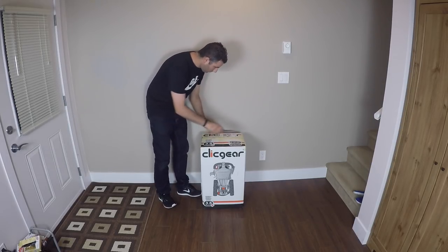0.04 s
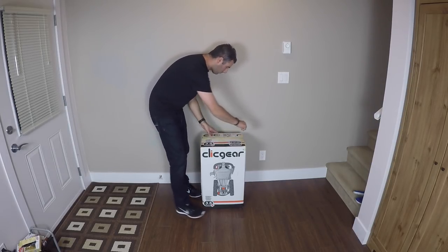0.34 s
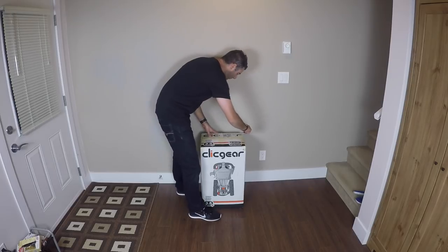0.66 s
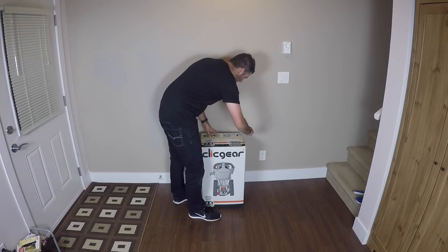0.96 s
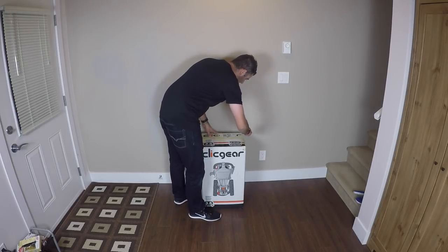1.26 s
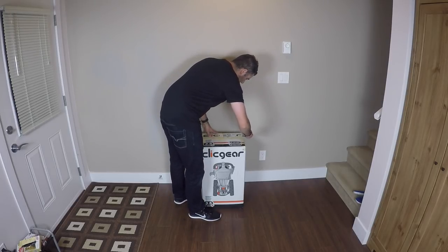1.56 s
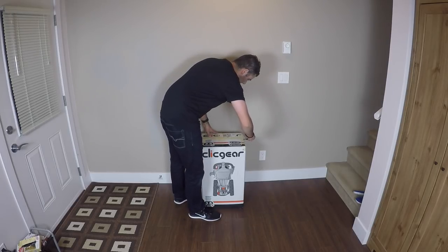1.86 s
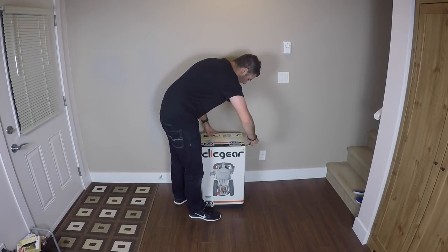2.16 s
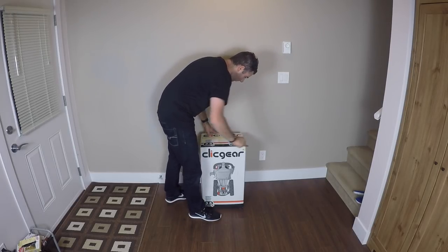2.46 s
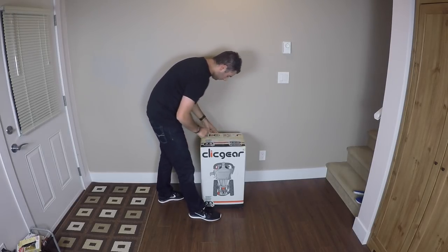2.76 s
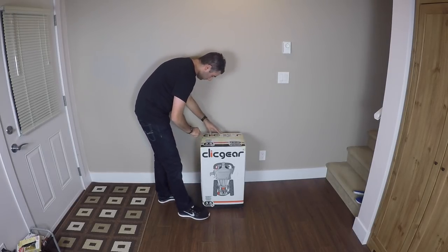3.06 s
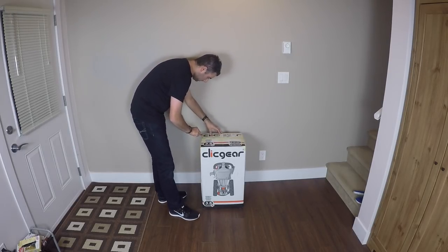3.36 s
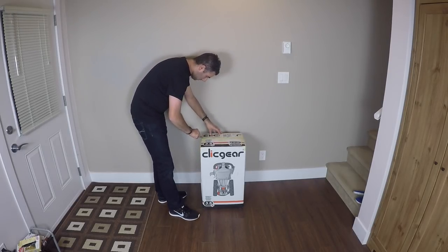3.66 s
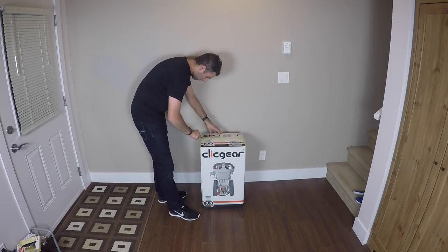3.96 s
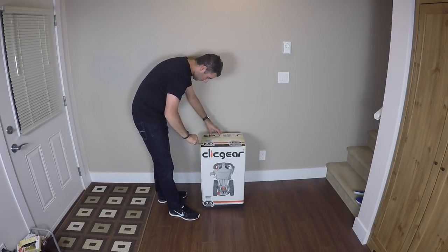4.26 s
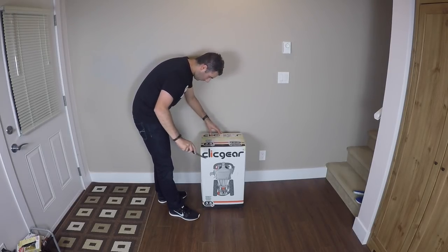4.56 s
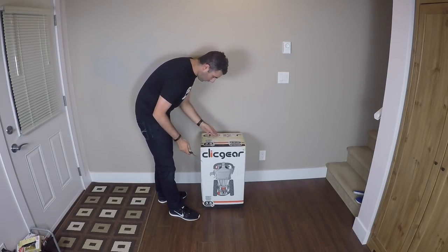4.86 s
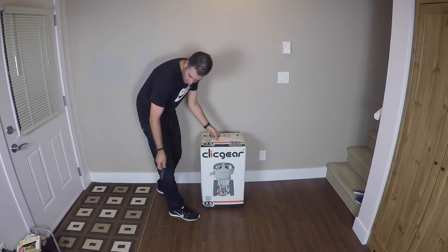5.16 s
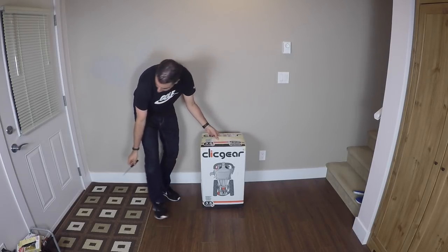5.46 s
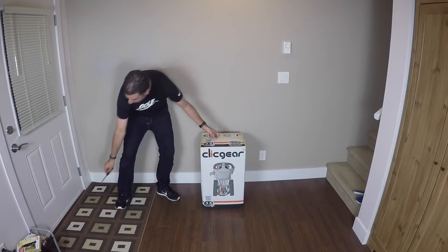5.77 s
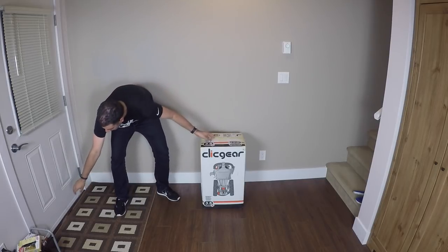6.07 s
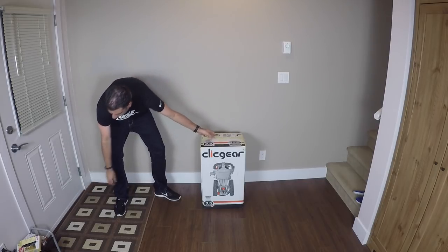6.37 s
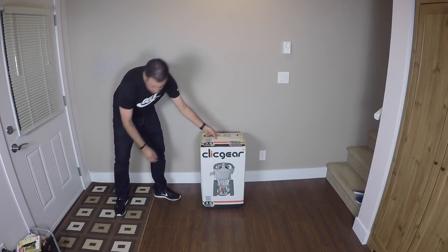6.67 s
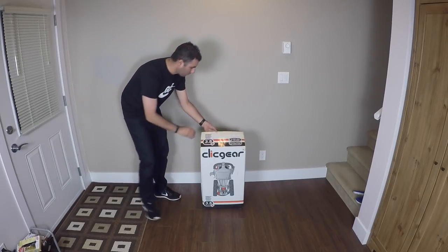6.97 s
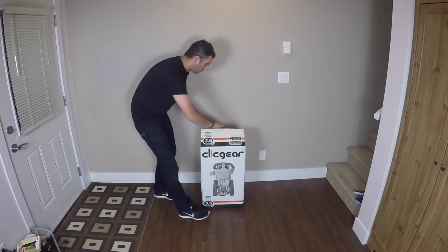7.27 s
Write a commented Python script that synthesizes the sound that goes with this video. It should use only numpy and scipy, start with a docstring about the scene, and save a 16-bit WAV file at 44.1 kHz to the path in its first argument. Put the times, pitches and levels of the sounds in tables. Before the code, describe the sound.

In a small, bare hallway, hands brush a cardboard box and a knife rasps through its packing tape, making the hollow panels drone. More short cuts follow, with crackling tape, knocks and soft shuffling steps. The knife is put down on the wooden floor with a sharp clack, then the flaps are pulled and the last tape pops. One fairly near microphone picks up a short room echo.

```python
"""Opening a taped box in a hallway

One microphone in a small, bare hallway with a wooden floor, just near enough for the direct sound
to outweigh the walls. A knife sticks and slips through the packing tape of a tall cardboard box,
tearing fibres while the panels drum. Hands brush the board and shoes shuffle; the knife is put
down with a clack, and the flaps are pulled until the last tape pops."""
import sys
import numpy as np
from scipy import signal
from scipy.fft import rfft, irfft, next_fast_len
from scipy.io import wavfile
from scipy.ndimage import uniform_filter1d, minimum_filter1d, map_coordinates

SR = 44100
rng = np.random.default_rng(int(sys.argv[2]) if len(sys.argv) > 2 else 0)


def to_wav(sig):
    """Store sig (one row per channel, or 1-D mono) as 16-bit WAV at the path in sys.argv[1].

    Samples outside -1..1 are clipped; the rate is SR.
    """
    pcm = np.clip(np.atleast_2d(sig), -1, 1) * 32767
    pcm = np.round(pcm).astype(np.int16)
    wavfile.write(sys.argv[1], SR, pcm.T)  # frames by channels


N = 331632
TIME = np.arange(N) / SR
AGE = np.arange(SR // 3) / SR  # seconds since a blow

# Spectra of the box and its tape. Each row: frequency in Hz, level in dB.
BOX_COLOUR = [(29, -36), (50, -13), (76, -5.5), (114, -3.5), (182, 3.5), (219, -8.5), (286, -4), (340, -3),
              (391, -13), (432, -8), (591, -9), (850, -15), (1000, -19), (1300, -40), (2200, -120)]  # the hollow body, rubbed or cut
DRUM_COLOUR = [(30, -34), (70, -10), (120, -2.5), (170, 2.5), (240, -3), (330, -7.5), (450, -31.5),
               (900, -73.5)]  # the panels, struck
BOARD_COLOUR = [(150, -27.5), (330, -1.5), (550, 0), (750, -6), (1000, -9), (1500, -19), (3000, -78)]  # the midrange knock of cardboard
TAPE_COLOUR = [(2940, -20), (5000, -3), (9880, -9.5), (10700, -11.5), (13400, -13), (15200, -19),
               (16000, -26)]  # tape splitting


def amp(db):
    """Decibels to gain."""
    return 10 ** (np.asarray(db) / 20)


def unit(x):
    """Scale to rms 1."""
    return x / np.sqrt(np.mean(x ** 2) + 1e-20)


def burst(x):
    """Scale a blow to the energy of 20 ms at rms 1."""
    return x / np.sqrt(np.sum(x ** 2) / (SR * .02) + 1e-20)


def along(points, hz):
    """Read (Hz, value) points on a log frequency axis."""
    freqs, values = np.transpose(points)
    return np.interp(np.log(hz + 1), np.log(freqs + 1), values)


def add(track, start_s, x):
    """Mix x into track from start_s on."""
    start = max(round(start_s * SR), 0)
    track[start:start + len(x)] += x[:max(N - start, 0)]


def coloured(x, colour):
    """Pass x through a minimum-phase filter with the given (Hz, dB) spectrum."""
    size = 4096
    cepstrum = irfft(np.log(amp(along(colour, np.fft.rfftfreq(size, 1 / SR))) + 1e-6))
    cepstrum[1:size // 2] *= 2
    cepstrum[size // 2 + 1:] = 0
    impulse_response = irfft(np.exp(rfft(cepstrum)))
    return signal.fftconvolve(x, impulse_response)[:len(x)]


def resonate(x, modes):
    """Pass x through parallel (Hz, width in Hz, dB) resonances."""
    size = next_fast_len(len(x) + SR // 4)
    f = np.fft.rfftfreq(size, 1 / SR)
    response = sum(amp(db) * 1j * f * width / (hz * hz - f * f + 1j * f * width)
                   for hz, width, db in modes)
    return irfft(rfft(x, size) * response, size)[:len(x)]


def wobble(rate):
    """A smooth random curve, rate knots a second."""
    return map_coordinates(rng.standard_normal(int(N * rate / SR) + 4), [TIME * rate])


def stroke(start, length, attack, release=0.026):
    """A gain that rises, holds for the length of the stroke and lets go; times in seconds."""
    rising = (TIME - start) / attack + .5
    falling = (start + length - TIME) / release + 1
    return np.clip(np.minimum(rising, falling), 0, 1)


def swell(middle, length):
    """A gain that swells and fades like the speed of a sweeping hand."""
    return np.cos(np.pi * np.clip((TIME - middle) / length, -.5, .5))


def fibres(rate, spread_db, size=N):
    """Breaking fibres: random impulses of uneven strength, rate a second."""
    strength = rng.choice([-1, 1], size) * amp(spread_db * np.clip(rng.standard_normal(size), -2, 2))
    return unit(strength * (rng.random(size) < rate / SR))


def crunch(length, colour, rate=9000, spread_db=4, rise=0.00078):
    """A clump of fibre breaks that builds quickly and dies away within length seconds."""
    shape = amp(-60 * AGE / length) * (1 - np.exp(-AGE / rise))
    return burst(coloured(fibres(rate, spread_db, size=len(AGE)) * shape, colour))


def room_tone():
    """Still air and the faint, wavering hum of an appliance."""
    # The air's spectrum and the hum's partials. Each row: frequency in Hz, level in dB.
    air_colour = [(20, -22), (45, 1), (70, 0.5), (100, -15), (175, -9.5), (260, -10.5), (600, -21.5),
                  (1400, -20.5), (3200, -27.5), (8000, -41.5), (16000, -50)]
    partials = [(59.2, -58), (177.6, -53)]
    hum = 0
    for hz, db in partials:
        peak = amp(db + 2.7 * wobble(1.78)) * np.sqrt(2)
        hum += peak * np.sin(2 * np.pi * hz * TIME + .5 * wobble(3.4))
    return hum + amp(-45) * unit(coloured(rng.standard_normal(N), air_colour))


def hallway(x, paths=16, turns_per_s=90):
    """Diffuse echo of the walls; each moment takes another path to the microphone as the hands move."""
    # How long the hallway rings. Each row: frequency in Hz, seconds to fall 60 dB.
    decay_times = [(100, 0.31), (260, 0.39), (700, 0.39), (1800, 0.56), (4800, 0.48), (12800, 0.38)]
    # Strength of the echo. Each row: frequency in Hz, level in dB.
    wall_colour = [(100, 0.5), (300, -3), (700, 0), (1400, -2), (3300, -1), (7000, -3.5), (14000, -6)]
    hz, t, noise = signal.stft(rng.standard_normal((paths, SR * 2 // 3)), SR, nperseg=256)
    decay = amp(-60 * t / along(decay_times, hz)[:, None])
    energy = np.sum(decay ** 2, 1, keepdims=True) * t[1] * SR
    decay *= amp(along(wall_colour, hz))[:, None] / np.sqrt(energy)
    _, tails = signal.istft(noise * decay, SR)
    out = np.zeros(N)
    for k, tail in enumerate(tails):
        crossfade = np.sin(np.pi / 2 * np.minimum((TIME * turns_per_s - k) % paths, 2))
        add(out, .005, signal.oaconvolve(x * crossfade, tail))
    return out


def brushing():
    """Palms and sleeves rub the box, which murmurs under them."""
    # Hand movements. Each row: middle and length in seconds, rustle and murmur in dB.
    sweeps = [(0.106, 0.73, -51.5, -56.5), (0.517, 0.39, -44, -45), (0.854, 0.51, -42, -46),
              (1.154, 0.2, -41.5, -40.5), (1.368, 0.28, -35, -35), (2.496, .3, -56, -48),
              (2.785, 0.4, -36.5, -34.5), (3.377, 0.27, -32.5, -33), (3.004, 0.22, -47, -40.5),
              (3.886, 0.86, -36, -33), (4.912, 0.28, -44.5, -33), (5.226, 0.62, -34, -50),
              (5.74, 0.57, -46.5, -41.5), (6.028, 0.29, -40.5, -44), (6.76, 0.78, -40.5, -43)]
    # The rubbed surface. Each row: frequency in Hz, level in dB.
    rustle_colour = [(150, 7), (350, -24.5), (700, -4.5), (1400, 3.5), (2400, -1), (3100, 4), (5000, -6.5),
                     (8000, -13), (13000, -20), (16000, -26)]
    rustle = unit(coloured(fibres(5000, spread_db=7), rustle_colour)) * amp(2.7 * wobble(30))
    murmur = unit(coloured(fibres(900, spread_db=1.5), BOX_COLOUR))
    return sum(swell(middle, length) * (amp(rustle_db) * rustle + amp(murmur_db) * murmur)
               for middle, length, rustle_db, murmur_db in sweeps)


def thuds():
    """A soft push swings one low mode of the box or floor, with a dull scuff on top."""
    # Bumps on the box and footfalls. Each row: start in seconds, level in dB, pitch in Hz.
    bumps = [(3.115, -28, 200), (3.49, -38, 189), (3.588, -10.5, 175), (3.792, -16.5, 216),
             (4.053, -13, 180), (4.079, -8, 167), (4.459, -16.5, 177), (4.651, -23.5, 185),
             (4.797, -24, 145), (4.831, -29, 71), (4.87, -25.5, 219), (4.935, -17, 130),
             (4.984, -25.5, 233), (5.078, -16, 147), (5.395, -14.5, 140), (6.468, -28.5, 316),
             (6.713, -27.5, 157), (6.778, -27.5, 164), (6.876, -16, 153), (6.936, -16.5, 158),
             (7.238, -36, 144), (7.325, -30, 119), (7.502, -15, 129)]
    sag = 1 + 0.1 * np.exp(-AGE / 0.0049)  # a panel is stiffer while it is pushed in
    shape = amp(-60 * AGE / 0.0732) * (1 - np.exp(-AGE / 0.0029))
    out = np.zeros(N)
    for start, db, hz in bumps:
        swing = shape * np.sin(2 * np.pi * hz * np.cumsum(sag) / SR)
        scuff = 0.6 * crunch(0.0432, DRUM_COLOUR, rise=0.0059)
        scuff += 0.23 * crunch(0.06, BOARD_COLOUR, rise=0.0033)
        add(out, start, amp(db) * (burst(swing) + scuff))
    return out


def scratch(middle=.7, length=.07, middle_hz=2760, octaves_per_s=18):
    """An accelerating scratch over the ridges of taut tape rises to a rough, hissing whistle."""
    ridge_hz = middle_hz * 2 ** (octaves_per_s * np.clip(TIME - middle, -length, length))
    phase = 2 * np.pi * np.cumsum(ridge_hz * (1 + .085 * wobble(1200))) / SR
    whistle = np.sin(phase) + 0.22 * np.sin(2 * phase) + 0.14 * np.sin(3 * phase)
    hiss = unit(coloured(fibres(7000, spread_db=5), TAPE_COLOUR))
    hiss *= amp(-9.5) * (ridge_hz / middle_hz) ** 2  # grows with speed
    rough_whistle = unit(whistle * amp(4.3 * wobble(700)))
    return amp(-28) * swell(middle, length) * (rough_whistle + hiss)


def stray_snaps(per_s=3.5, until_s=6.2, spread_db=9):
    """Rows (seconds, paper dB, tape dB) of faint chance snaps while the hands work the box."""
    when, strength = rng.random((int(per_s * until_s), 2)).T
    offset_db = spread_db * (2 * strength - 1)
    return list(zip(when * until_s, offset_db - 52.5, offset_db - 52))


def snaps():
    """Strands of tape and paper part with a short crackle."""
    # The main snaps. Each row: start in seconds, paper and tape in dB.
    main_snaps = [(.063, -43.5, -52.5), (0.284, -45, -69), (0.458, -43, -46), (.716, -31, -32),
                  (1.111, -35, -42), (1.275, -32.5, -34), (1.348, -34, -36.5), (1.427, -28, -44),
                  (1.803, -46, -37), (1.975, -28, -29), (2.181, -33, -24), (2.745, -43, -30),
                  (2.763, -30.5, -34.5), (3.299, -21, -37), (3.391, -20.5, -32), (3.485, -21.5, -25.5),
                  (3.527, -16, -19.5), (3.554, -17.5, -21), (4.007, -36, -42), (4.099, -18.5, -23.5),
                  (4.433, -31, -33), (4.584, -38.5, -42.5), (4.929, -37, -65), (5.196, -27.5, -33),
                  (5.365, -32, -25.5), (5.672, -45, -43), (6.4, -43, -52), (6.636, -28.5, -26.5),
                  (6.913, -26.5, -29), (6.928, -23, -23)]
    # Paper fibre breaking. Each row: frequency in Hz, level in dB.
    paper_colour = [(500, -24.5), (1500, -14), (2400, -4.5), (3300, 1.5), (4500, -6), (6000, -17.5),
                    (10000, -29)]
    out = np.zeros(N)
    for start, paper_db, tape_db in main_snaps + stray_snaps():
        paper = crunch(0.043, paper_colour, rise=0.0035)
        tape = crunch(0.06, TAPE_COLOUR, rate=2200, spread_db=5, rise=0.0012)
        add(out, start, amp(paper_db) * paper + amp(tape_db) * tape)
    return out


def pops():
    """Board gives way at once: the tape cracks, the edge clacks, the panels drum a little longer."""
    # Knocks and pops around the box. Each row: start in seconds, clack and drum in dB, clack in Hz.
    knocks = [(.561, -34.5, -33, 1640), (.609, -34.5, -30, 1740), (0.775, -31, -31.5, 2920),
              (1.347, -32, -31.5, 1430), (1.453, -33, -24, 1280), (2.268, -13, -25.5, 1410),
              (2.7, -32, -22, 620), (2.763, -28, -28.5, 1740), (4.098, -14, -21, 1400),
              (4.129, -16, -17, 2980), (4.146, -19.5, -11, 1620), (4.433, -21.5, -15.5, 1500),
              (5.073, -14, -22, 1310), (5.363, -20, -23, 4160), (6.481, -24.5, -39, 2070),
              (6.572, -20, -27, 1180), (6.586, -17.5, -23, 1910), (6.929, -19.5, -20.5, 1490),
              (7.499, -40, -22, 704)]
    # A cardboard edge. Each row: frequency in Hz, level in dB.
    edge_colour = [(400, -37), (900, -4), (1400, 5), (2300, -3), (3200, 1), (4500, -7), (6500, -16),
                   (12000, -36)]
    out = np.zeros(N)
    for start, clack_db, drum_db, clack_hz in knocks:
        edge = crunch(0.048, edge_colour)
        clack = amp(clack_db) * burst(edge + 2.3 * resonate(edge, [(clack_hz, 0.31 * clack_hz, 0)]))
        tape = amp(clack_db - 28.5) * crunch(0.055, TAPE_COLOUR, rate=4200, spread_db=5)
        board = amp((clack_db + drum_db) / 2 - 1) * crunch(0.056, BOARD_COLOUR)
        drum = amp(drum_db) * crunch(0.066, DRUM_COLOUR)
        add(out, start, clack + tape + board + drum)
    return out


def knife_down():
    """The knife strikes the floor twice in quick succession and the boards knock back."""
    # Tip, then handle. Each row: time in seconds, then clack, click and floor thump in dB.
    strikes = [(6.2112, -13.5, -26, -18), (6.2192, -11, -22.5, -26)]
    # Floorboard resonances. Each row: frequency and width in Hz, level in dB.
    floor_modes = [(199, 32, 13), (129, 87, -18)]
    # The strike's body and its bright onset. Each row: frequency in Hz, level in dB.
    clack_colour = [(60, -10), (200, -3), (450, -7), (600, 3), (950, -1), (1250, -4.5), (1550, -5),
                    (2400, -16), (3200, -18), (5000, -41), (9000, -41), (16000, -61)]
    click_colour = [(900, -21), (3200, 6.5), (5300, -3), (8000, -14.5), (16000, -37)]
    ring = resonate(signal.unit_impulse(len(AGE)), floor_modes)
    thump = burst(ring * (1 - np.exp(-AGE / 0.00062)))
    out = np.zeros(N)
    for time, clack_db, click_db, thump_db in strikes:
        add(out, time, amp(clack_db) * crunch(0.054, clack_colour) + amp(thump_db) * thump)
        # treble travels fastest through a board, so the click arrives first
        add(out, time - .0012, amp(click_db) * crunch(0.017, click_colour))
    return out


def gliding(start=2.975, ease_db_per_s=30):
    """Drawn lightly along the seam, the blade only scuffs the surface: a fine grain."""
    # The scuffed seam. Each row: frequency in Hz, level in dB.
    seam_colour = [(240, -5), (400, -12), (489, -12), (753, -12.5), (826, -9), (893, -8), (1070, -9),
                   (1420, 0), (2120, -3), (2290, -7), (3120, -2.5), (5520, -14.5), (12900, -27),
                   (16000, -36)]
    contact = stroke(start, length=.495, attack=.17)
    push = contact * amp(-20.5 - ease_db_per_s * np.maximum(TIME - start, 0))
    grain = unit(coloured(fibres(9000, spread_db=2), seam_colour))
    return push * grain * amp(1.14 * wobble(35))


def cut_gains(ease_db_per_s=12):
    """Gains of board, box and tape: the push eases along each stroke while the tape hisses evenly."""
    # Cuts and tears. Each row: start, length and attack in seconds, then rasp, drone and hiss in dB.
    cuts = [(1.452, 0.6, 0.02, -22, -16, -36.5), (2.029, 0.12, 0.02, -21, -19.5, -32.5),
            (2.184, 0.064, 0.056, -19.5, -20, -26), (3.481, .13, 0.025, -20.5, -16, -26.5),
            (3.771, 0.098, 0.022, -23, -22, -31), (4.053, 0.109, 0.048, -20.5, -13, -29),
            (4.204, 0.097, 0.027, -29, -28, -35), (4.333, 0.13, .02, -24.5, -23.5, -34.5),
            (5.03, 0.024, 0.0067, -22.5, -22.5, -24.5), (5.181, 0.02, 0.011, -26.5, -22.5, -32.5),
            (5.317, 0.098, 0.021, -29.5, -30.5, -33.5), (6.832, 0.031, 0.014, -28, -27.5, -38),
            (6.925, 0.044, .006, -27.5, -19, -53)]
    rasp = drone = hiss = 0
    for start, length, attack, rasp_db, drone_db, hiss_db in cuts:
        contact = stroke(start, length, attack)
        push = contact * amp(-ease_db_per_s * np.maximum(TIME - start, 0))
        rasp += amp(rasp_db) * push
        drone += amp(drone_db) * push
        hiss += amp(hiss_db) * contact
    return rasp, drone, hiss


def flap_squawks(torn, width_hz=140):
    """Tearing fibres ring the flap, which squawks as the blade nears the end of the seam."""
    # Each row: middle and length in seconds, level in dB, pitch in Hz.
    squawks = [(2.086, 0.038, -21, 1120), (2.228, 0.033, -21, 1570)]
    return sum(amp(db) * swell(middle, length) * unit(resonate(torn, [(hz, width_hz, 0)]))
               for middle, length, db, hz in squawks)


def cutting():
    """The blade sticks and slips through the flutes: each slip shakes the box and tears some fibres."""
    # Resonances of the box and of the flap being cut. Each row: frequency and width in Hz, level in dB.
    panel_modes = [(189, 32, -1), (319, 77, -0.5), (512, 82, 3.5)]
    flap_modes = [(1330, 680, -13.5), (1430, 590, 6.5), (3030, 150, 3), (4380, 113, -6)]
    # Cardboard tearing. Each row: frequency in Hz, level in dB.
    rasp_colour = [(500, -13.5), (850, -5.5), (921, 0.5), (998, -4.5), (1120, 0.5), (1220, -2), (1540, -2),
                   (2250, -2), (3100, -2.5), (3760, -0.5), (4070, -2), (4520, -5.5), (5800, -13.5),
                   (7540, -35), (12800, -120)]
    slip_hz = 172 * np.exp(.2 * wobble(25) + .28 * wobble(210))
    slip_count = np.floor(np.cumsum(slip_hz) / SR)
    slips = np.diff(slip_count, prepend=0) * amp(4.4 * wobble(130))
    puffs = np.abs(signal.fftconvolve(slips, amp(-60 * AGE / 0.026))[:N])
    tearing = unit(.5 + unit(puffs))
    push = 0.37 * unit(slips) + fibres(2500, spread_db=3.5)
    box = coloured(push + 0.43 * resonate(push, panel_modes), BOX_COLOUR)
    # fine fibres pulse with the slips; coarse strands break at random
    torn = tearing * fibres(4500, spread_db=4.5) + 0.33 * fibres(130, spread_db=4)
    # as the blade travels it drives each resonance of the flap more or less strongly
    flap = sum(resonate(torn * amp(4.2 * wobble(22)), [mode]) for mode in flap_modes)
    board = coloured(torn + 0.58 * flap, rasp_colour)
    splitting = tearing * fibres(7600, spread_db=4) + 0.2 * fibres(110, spread_db=1)
    tape = coloured(splitting, TAPE_COLOUR) * amp(0.3 * wobble(45))
    rasp, drone, hiss = cut_gains()
    return drone * unit(box) + rasp * unit(board) + hiss * unit(tape) + flap_squawks(torn)


def scene():
    """At the microphone, in mono: all the handling, its echo and the quiet room."""
    direct = cutting() + gliding() + brushing() + scratch() + pops() + thuds() + snaps() + knife_down()
    return (direct + amp(-1.5) * hallway(direct) + room_tone())[None]


def record(dry):
    """The microphone feeds a fast peak limiter and a sharp treble cutoff."""
    ceiling, top_hz = .95, 16100
    needed_gain = np.minimum(1, ceiling / (np.abs(dry) + 1e-9))
    held_gain = minimum_filter1d(needed_gain, size=265)
    limited = dry * uniform_filter1d(held_gain, size=221)
    size = next_fast_len(N + SR // 4)
    passband = np.fft.rfftfreq(size, 1 / SR) < top_hz
    return irfft(rfft(limited, size) * passband, size)[..., :N]


dry = scene()
out = record(dry)
to_wav(out)
```